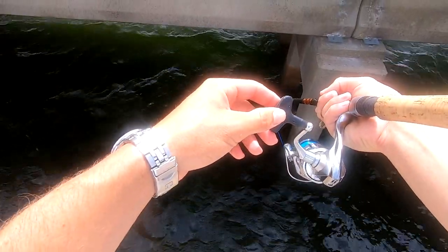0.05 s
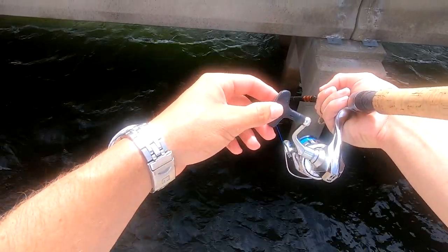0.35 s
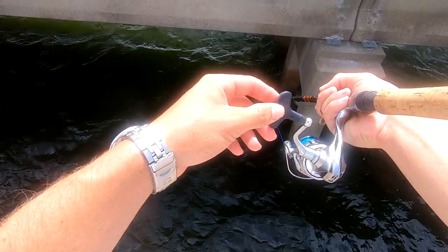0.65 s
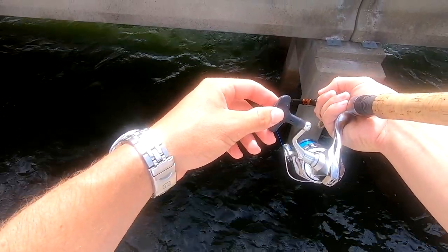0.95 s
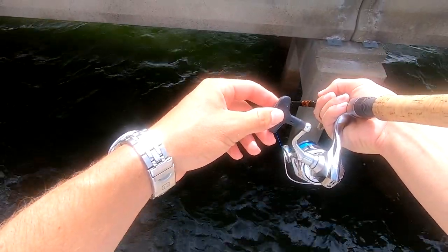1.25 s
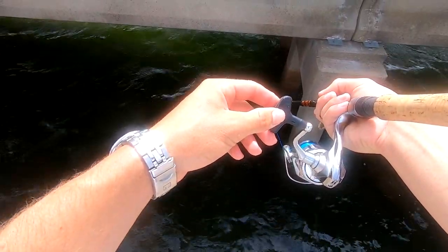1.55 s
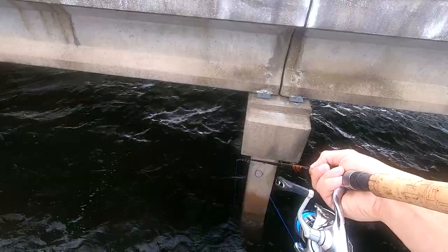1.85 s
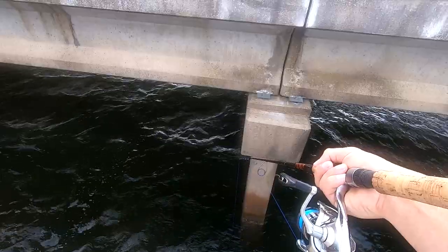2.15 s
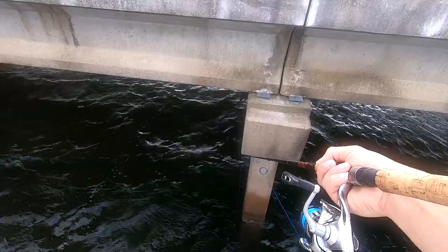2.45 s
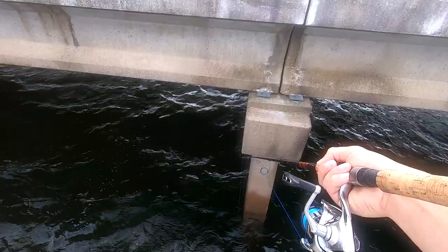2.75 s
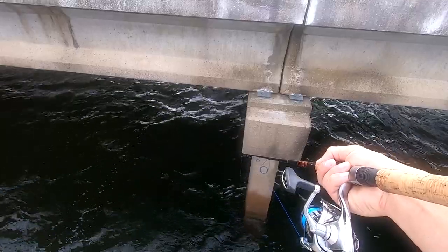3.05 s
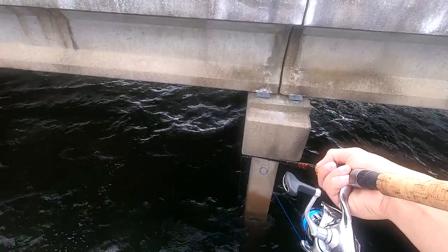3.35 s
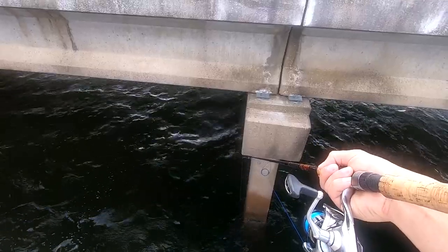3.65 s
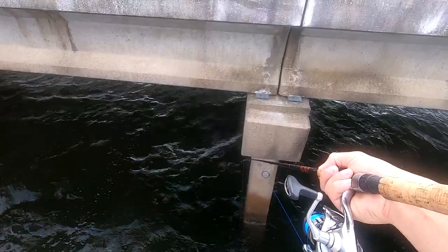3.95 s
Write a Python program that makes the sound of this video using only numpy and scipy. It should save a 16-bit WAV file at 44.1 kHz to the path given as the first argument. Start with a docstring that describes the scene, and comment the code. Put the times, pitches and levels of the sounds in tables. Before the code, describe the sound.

Wind buffets the microphone over choppy water slapping bridge piles, with distant traffic roaring.

```python
"""Beside a concrete road bridge over choppy water, on a windy day, heard from one spot and then another.
Turbulent eddies buffet the microphone, deep at the first spot and higher at the second, and air hisses
over the water. Waves slap the piles, and trapped air resonates as bubbles that slosh and glug.
Traffic roars far off, while single vehicles sink in pitch as they pass."""
import sys
import numpy as np
from scipy import signal
from scipy.fft import rfft, irfft, next_fast_len
from scipy.io import wavfile
from scipy.ndimage import uniform_filter1d

SR = 44100
rng = np.random.default_rng(int(sys.argv[2]) if len(sys.argv) > 2 else 0)


def persist_wave(psi):
    """Save psi, clipped to +-1, as 16-bit WAV."""
    counts = np.round(np.clip(psi, -1, 1) * 32767).astype(np.int16)
    wavfile.write(sys.argv[1], SR, np.atleast_2d(counts).T)


N = 176400
TIME = np.arange(N) / SR
SPOT_CHANGE_S = 1.855

# Buffeting spectrum at each spot: f/Hz, density level/dB
BUFFET_SPECTRUM_1 = [(12, -28.5), (25, -32), (45, -40), (70, -47), (110, -60.5), (200, -71.5), (400, -95),
                     (800, -115)]
BUFFET_SPECTRUM_2 = [(12, -65), (30, -55.5), (60, -51.5), (120, -52.5), (220, -57.5), (330, -66),
                     (550, -73), (1000, -94)]
# Gust strength at each spot: t/s, gain/dB
GUSTS_1 = [(0, 0.5), (.06, -0.5), (.19, -3), (.27, 1), (.35, -2), (.42, 0.5), (.53, 8), (.65, -3.5),
           (.71, 3), (.78, 1), (.88, -1), (1.04, -4), (1.11, 0), (1.23, -5.5), (1.33, 4.5), (1.46, 1.5),
           (1.58, 1.5), (1.68, 0.5), (1.85, 0.5)]
GUSTS_2 = [(1.859, 2), (2.051, -1), (2.299, 0.5), (2.451, -9.5), (2.78, -12), (2.881, 1), (3.0, 0),
           (3.12, 5), (3.16, 0.5), (3.22, 6.5), (3.29, 1), (3.44, -1), (3.51, -4.5), (3.6, -2),
           (3.85, -1.5), (3.96, 3)]
# Spectrum of air rushing over the water at each spot: f/Hz, density level/dB
HISS_SPECTRUM_1 = [(900, -105), (2000, -75.5), (2800, -83.5), (5000, -90.5), (6500, -96.5), (8000, -98),
                   (10500, -101.5), (13000, -110), (16000, -116)]
HISS_SPECTRUM_2 = [(900, -90.5), (2000, -86.5), (2500, -83), (3200, -82.5), (4000, -88), (6000, -92),
                   (8000, -101), (9600, -106), (10600, -119)]
# Rise and fall of the hiss: t/s, gain/dB
HISS_GAIN = [(0, -7), (.35, -6), (.53, -3.5), (.66, -6), (.82, -7.5), (1.25, -5.5), (1.42, -1.5),
             (1.75, -0.5), (2.3, -1), (2.5, -2), (3.07, 0), (3.48, -3), (3.6, 0), (4, -1)]
# Spectrum of far traffic at each spot: f/Hz, density level/dB
ROAR_SPECTRUM_1 = [(100, -70), (260, -71), (380, -67.5), (650, -70.5), (850, -68.5), (1070, -75),
                   (1350, -69.5), (1700, -75.5), (2300, -93), (4000, -110)]
ROAR_SPECTRUM_2 = [(100, -63.5), (300, -76), (450, -70), (700, -72), (930, -68), (1230, -76.5),
                   (1650, -70.5), (2300, -83.5), (4000, -100)]
# Rise and fall of the roar: t/s, gain/dB
ROAR_GAIN = [(0, -2), (.33, 3), (.7, -1), (1.0, 0), (1.25, 2), (1.8, 2.5), (2.0, 0), (2.7, 3), (3.1, 2.5),
             (3.45, 1), (3.8, 3), (4, 1)]
# Waves striking the piles: t/s, level/dB, hollow f/Hz, 30 dB decay time/s
WAVE_SLAPS = [(0.22, -30, 1010, 0.012), (0.512, -31.5, 885, 0.04), (1.2, -32, 790, 0.076),
              (2.125, -33.5, 450, 0.1), (2.735, -36.5, 740, 0.46), (3.746, -31, 960, 0.04),
              (3.901, -29.5, 744, 0.053), (3.92, -29, 520, 0.063), (3.968, -28.5, 750, 0.018)]
# Water surging round the piles: peak t/s, rise/s, fall/s, level/dB, centre f/Hz, sink/(octave/s)
WATER_SLOSHES = [(.3, 0.047, 0.065, -40, 750, 0.88), (2.8, 0.11, 0.15, -34, 479, .9),
                 (3.2, 0.27, 0.054, -31.5, 198.7, 0.33), (3.33, 0.046, 0.12, -31.5, 240.7, 1.7)]
# Trapped pockets of air: t/s, peak level/dB, f/Hz, 60 dB decay time/s
AIR_POCKETS = [(.322, -37, 490, 0.06), (1.074, -28.5, 438.4, .13), (1.204, -29, 407, 0.084),
               (2.126, -27, 310, 0.036), (2.139, -24, 420, 0.031), (2.226, -26, 953, .035),
               (2.648, -28, 482, .16), (2.755, -29, 455, 0.12), (2.79, -29, 390, .14),
               (3.2, -13, 189, 0.052), (3.226, -14.5, 126.6, 0.083), (3.293, -23, 317, 0.065),
               (3.385, -22, 184, .1), (3.746, -24, 710, 0.038), (3.753, -25, 423, 0.04),
               (3.901, -22.5, 610, 0.014), (3.928, -21, 330, 0.065), (3.966, -22, 150, 0.071)]
# Crests breaking into spray: peak t/s, rise/s, fall/s, level/dB, centre f/Hz
BREAKING_CRESTS = [(.52, 0.08, 0.068, -63, 5200), (2.271, 0.086, 0.22, -66, 8300),
                   (3.55, 0.032, 0.073, -57.5, 4200)]
# One vehicle passing, in overlapping stages of its sinking rush: peak t/s, rise/s, fall/s, level/dB, centre
# f/Hz, sink/(octave/s)
VEHICLE_PASS_STAGES = [(1.26, 0.14, 0.37, -38, 688.4, 0.46), (1.448, 0.35, 1, -38, 424.2, .15),
                       (1.801, 0.16, 0.11, -36.5, 200.2, .3)]
# Tyres singing on the deck: peak t/s, rise and fall/s, level/dB, centre f/Hz
TYRE_TONES = [(2.28, 0.26, -40, 944.4), (3.842, 0.11, -40.5, 881)]


def from_db(db):
    """Amplitude grows tenfold for every 20 dB."""
    return 10 ** (np.asarray(db) / 20)


def unit_rms(x):
    """Normalisation to unit mean power."""
    return x / np.sqrt(np.mean(x ** 2) + 1e-20)


def gain_curve(rows):
    """An amplitude envelope, linear in decibels between the given points."""
    return from_db(np.interp(TIME, *np.transpose(rows)))


def flicker(rate_hz, depth_db, size=N):
    """Random amplitude modulation with a standard deviation of depth_db."""
    hop = 100
    pole = np.exp(-2 * np.pi * rate_hz * hop / SR)
    slow = signal.lfilter([1], [1, -2 * pole, pole ** 2], rng.standard_normal(size // hop + 1002))
    gain = from_db(depth_db * unit_rms(slow[500:]))
    return np.interp(np.arange(size) / hop, np.arange(len(gain)), gain)


def band(x, low_hz, high_hz):
    """A band-pass filter attenuates frequencies outside its two edges."""
    return signal.sosfilt(signal.butter(2, [low_hz, high_hz], "band", fs=SR, output="sos"), x)


def low_pass(x, hz):
    """An elliptic filter attenuates steeply above hz."""
    return signal.sosfilt(signal.ellip(10, .1, 80, hz, fs=SR, output="sos"), x)


def coloured(spectrum, flicker_db, size):
    """Spectral shaping of white noise, with each octave modulated independently."""
    hz, db = np.transpose(spectrum)
    length = next_fast_len(size, True)
    octave = np.log2(np.arange(length // 2 + 1) * SR / length + 1)
    density = from_db(np.interp(octave, np.log2(hz), db)) * np.sqrt(SR / 2)
    shaped = density * rfft(rng.standard_normal(length))
    out = np.zeros(size)
    for k in range(int(np.log2(hz[0])), int(np.log2(hz[-1])) + 1):
        one_octave = irfft(shaped * (np.floor(octave) == k), length)[:size]
        out += one_octave * flicker(rate_hz=9, depth_db=flicker_db, size=size)
    return out


def spot_noises(spectrum_1, spectrum_2, flicker_db):
    """Two shaped noises, each lasting as long as the stay at its spot."""
    first = int(SPOT_CHANGE_S * SR)
    return coloured(spectrum_1, flicker_db[0], first), coloured(spectrum_2, flicker_db[1], N - first)


def same_spot(t):
    """A gate, open while the listener is at the same spot as at time t."""
    return (TIME < SPOT_CHANGE_S) == (t < SPOT_CHANGE_S)


def evened(x, window_s=0.1):
    """Division by the running rms levels out chance swells and lulls."""
    width = int(window_s * SR)
    power = uniform_filter1d(uniform_filter1d(x ** 2, width), width // 2)
    return x * np.sqrt(np.mean(x ** 2) / (power + 1e-12))


def swell(peak_s, rise_s, fall_s):
    """A Gaussian envelope with a different width on each side."""
    width_s = np.where(TIME < peak_s, rise_s, fall_s)
    return np.exp(-((TIME - peak_s) / width_s) ** 2 / 2)


def gliding_noise(hz, width_hz):
    """Quadrature modulation shifts low-passed noise to a moving centre frequency."""
    smoothing = signal.butter(3, width_hz / 2, fs=SR, output="sos")
    in_phase, quadrature = signal.sosfilt(smoothing, rng.standard_normal((2, N)))
    phase = 2 * np.pi * np.cumsum(hz) / SR
    return unit_rms(in_phase * np.cos(phase) + quadrature * np.sin(phase))


def add(out, t, sound):
    """Superposition of a sound that starts at time t."""
    start = int(t * SR)
    out[start:start + len(sound)] += sound[:max(len(out) - start, 0)]


def bubble(hz, decay_s, pitch_rise=0.074, onset_cycles=0.94):
    """Air in water is a damped oscillator; its pitch rises a little as it decays by 60 dB."""
    age = np.arange(int(decay_s * SR) + 2) / SR
    cycles = hz * age * (1 + pitch_rise * age / decay_s / 2)
    envelope = np.minimum(cycles / onset_cycles, 1) * from_db(-60 * age / decay_s)
    return envelope / envelope.max() * np.sin(2 * np.pi * cycles)


def wind_buffet(ceiling=0.64):
    """Turbulent pressure thumps on the microphone, harder in gusts; saturation rounds the peaks."""
    first, second = spot_noises(BUFFET_SPECTRUM_1, BUFFET_SPECTRUM_2, flicker_db=(1.1, 1.5))
    pressure = np.r_[evened(first), evened(second)]
    pressure *= gain_curve(GUSTS_1 + GUSTS_2) * flicker(rate_hz=26, depth_db=1.88)
    return ceiling * np.tanh(pressure / ceiling)


def water_hiss():
    """Airflow over ruffled water makes broadband noise, joined by spray; duller at the second spot."""
    rush = np.concatenate(spot_noises(HISS_SPECTRUM_1, HISS_SPECTRUM_2, flicker_db=(0.5, 0.4)))
    hiss = (rush * gain_curve(HISS_GAIN) + spray()) * flicker(rate_hz=27, depth_db=0.55)
    return np.where(TIME < SPOT_CHANGE_S, hiss, low_pass(hiss, hz=10400))


def far_traffic():
    """Many distant vehicles sum incoherently to a continuous roar."""
    roar = np.concatenate(spot_noises(ROAR_SPECTRUM_1, ROAR_SPECTRUM_2, flicker_db=(0.8, 0.7)))
    return roar * gain_curve(ROAR_GAIN) * flicker(rate_hz=136, depth_db=0.94)


def chop(bubbles_per_s=260, ring_cycles=14, tilt_db_per_octave=-3.5):
    """Small crests collapse into bubbles of many sizes, each ringing at its natural frequency."""
    birth_chance = bubbles_per_s * flicker(rate_hz=4, depth_db=4) / SR
    strengths = from_db(6.4 * np.minimum(rng.exponential(1, N), 4)) * rng.choice([-1, 1], N)
    births = np.flatnonzero(rng.random(N) < birth_chance)
    hz = 450 * 2 ** rng.uniform(0, 3.43, N)
    out = np.zeros(N)
    for i in births:
        cycles = np.arange(int(ring_cycles * SR / hz[i])) * hz[i] / SR
        ring = np.sin(2 * np.pi * cycles) * from_db(-60 * cycles / ring_cycles)
        add(out, i / SR, strengths[i] * from_db(tilt_db_per_octave * np.log2(hz[i])) * ring)
    return from_db(-56) * unit_rms(band(out, 350, 3800))


def slaps(attack_s=0.0011, relative_width=0.74, splash_db=-15.5):
    """The impact of a wave on a pile excites a hollow, damped burst and a brighter splash."""
    out = np.zeros(N)
    age = np.arange(SR // 2) / SR
    edge_ratio = 1 + relative_width / 2
    for t, db, hz, decay_s in WAVE_SLAPS:
        envelope = np.minimum(age / attack_s, 1) * from_db(-30 * age / decay_s)
        body = unit_rms(band(rng.standard_normal(len(age)), hz / edge_ratio, hz * edge_ratio))
        splash = unit_rms(band(rng.standard_normal(len(age)), 1100, 2950))
        add(out, t, from_db(db) * envelope * (body + from_db(splash_db) * splash))
    return out


def sloshes(bubbles_per_s=220, spread_octaves=0.322, spread_db=1.5, ring_cycles=18):
    """Many bubble resonances superpose into a slosh that swells and deepens as it goes."""
    out = np.zeros(N)
    for t, rise, fall, db, hz, sink in WATER_SLOSHES:
        crowd = np.zeros(N)
        for k in range(int(bubbles_per_s * N / SR)):
            delay, detune, strength = rng.standard_normal(3)
            born_s = abs(k + delay) / bubbles_per_s
            drop_octaves = sink * np.clip(born_s - t, -2 * rise, 2 * fall)
            bubble_hz = hz * 2 ** (spread_octaves * detune - drop_octaves)
            ring = bubble(bubble_hz, ring_cycles / bubble_hz)
            add(crowd, born_s, from_db(spread_db * strength) * ring)
        out += from_db(db) * swell(t, rise, fall) * unit_rms(evened(crowd))
    return out


def glugs():
    """Large air pockets, trapped by waves against the concrete, resonate with the air as a spring."""
    out = np.zeros(N)
    for t, db, hz, decay_s in AIR_POCKETS:
        add(out, t, from_db(db) * bubble(hz, decay_s))
    return out


def spray():
    """Droplets from a breaking crest sum incoherently to a fizz one octave wide."""
    out = np.zeros(N)
    for t, rise, fall, db, hz in BREAKING_CRESTS:
        fizz = band(rng.standard_normal(N), hz / np.sqrt(2), hz * np.sqrt(2))
        out += from_db(db) * swell(t, rise, fall) * unit_rms(fizz)
    return out


def passing_vehicles(relative_width=0.52):
    """The Doppler effect lowers the pitch of a vehicle's rush as it goes by, in overlapping stages."""
    out = np.zeros(N)
    for t, rise, fall, db, hz, sink in VEHICLE_PASS_STAGES:
        centre_hz = hz * 2 ** (-sink * np.clip(TIME - t, -1, 1))
        rush = gliding_noise(centre_hz, relative_width * hz) * flicker(rate_hz=41, depth_db=0.9)
        out += from_db(db) * swell(t, rise, fall) * same_spot(t) * rush
    return out


def singing_tyres(relative_width=0.23, sink_octaves_per_s=0.087):
    """Rolling contact with the deck radiates narrow-band noise that slowly sinks in pitch."""
    out = np.zeros(N)
    for t, width_s, db, hz in TYRE_TONES:
        centre_hz = hz * 2 ** (-sink_octaves_per_s * (TIME - t))
        tone = gliding_noise(centre_hz, relative_width * hz)
        out += from_db(db) * swell(t, width_s, width_s) * same_spot(t) * tone
    return out


def scene():
    """Pressures superpose at one microphone; the water below arrives without its highest treble."""
    air = wind_buffet() + water_hiss()
    road = far_traffic() + passing_vehicles() + singing_tyres()
    water = chop() + slaps() + sloshes() + glugs()
    return (air + road + low_pass(water, hz=9100))[None]


def record(dry, fade_s=0.0068):
    """The bandwidth is limited, and the level dips for an instant at the change of spot."""
    dip = np.minimum(np.abs(TIME - SPOT_CHANGE_S) / fade_s, 1)
    return low_pass(dry * dip, hz=15700)


dry = scene()
out = record(dry)
persist_wave(out)
```